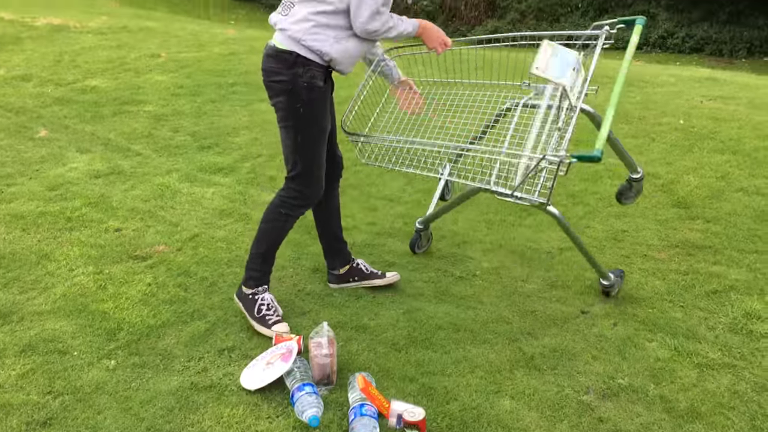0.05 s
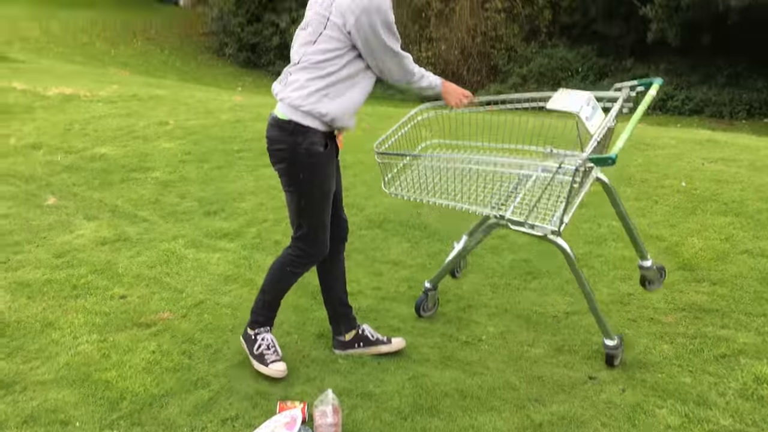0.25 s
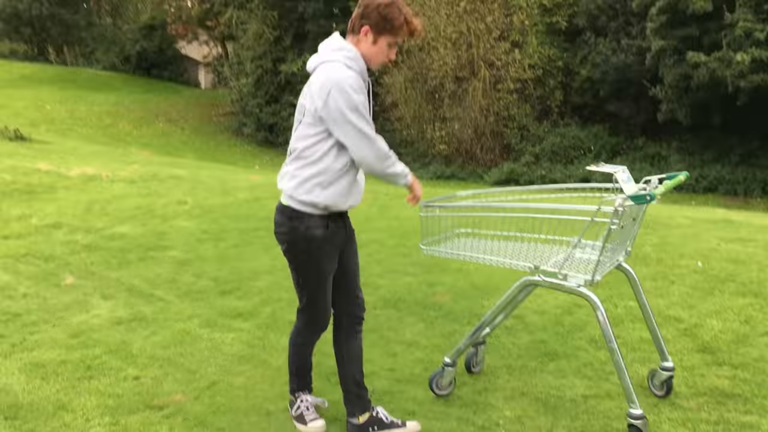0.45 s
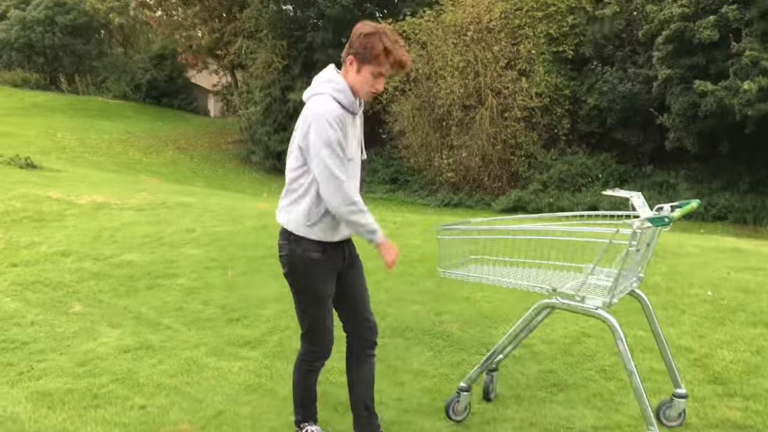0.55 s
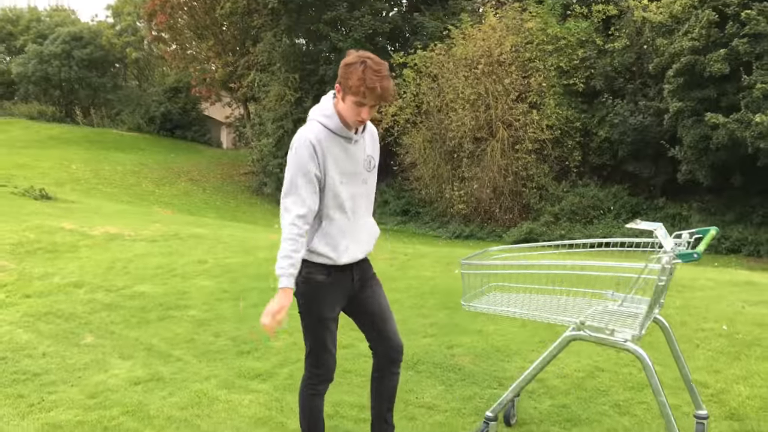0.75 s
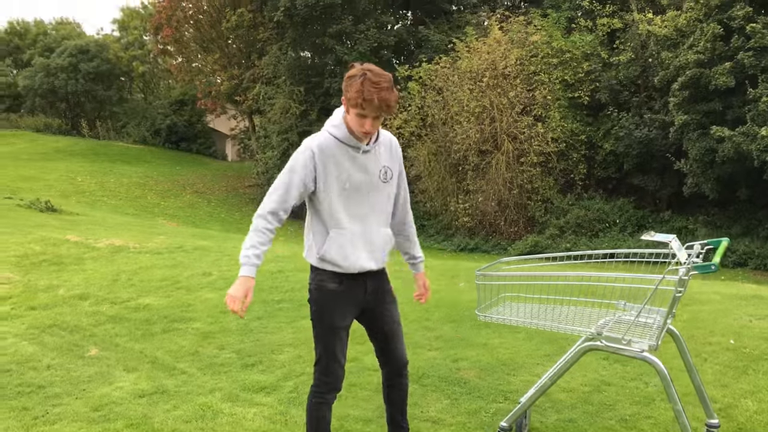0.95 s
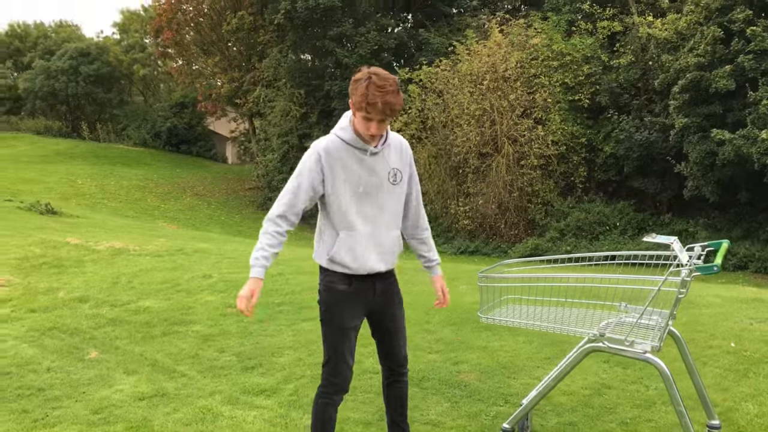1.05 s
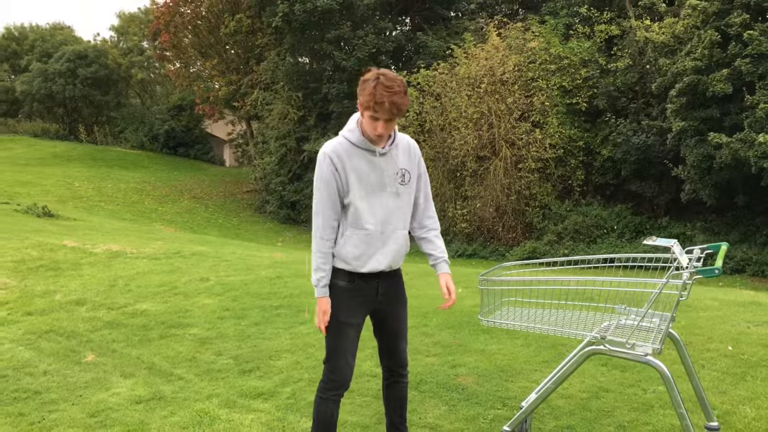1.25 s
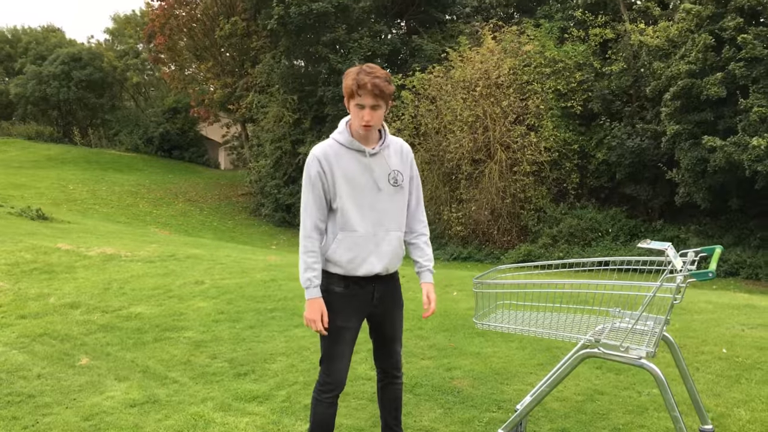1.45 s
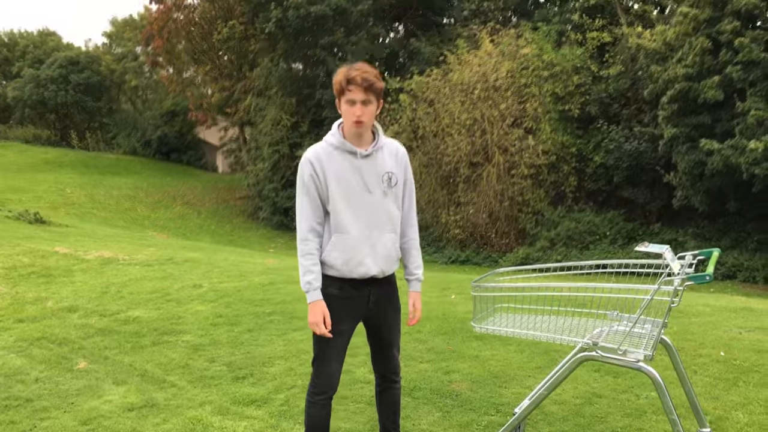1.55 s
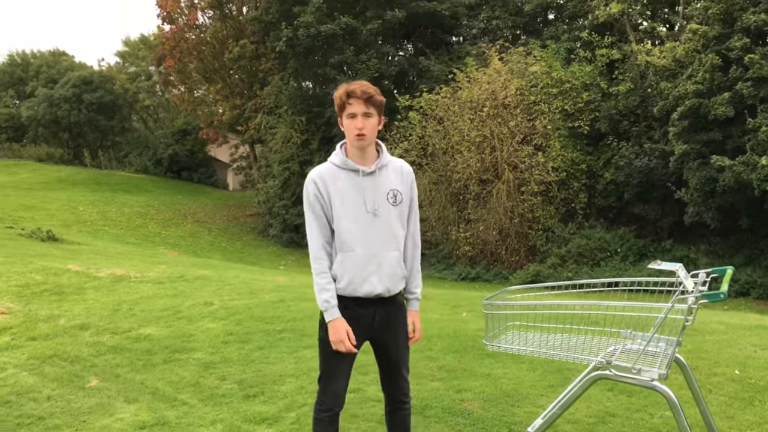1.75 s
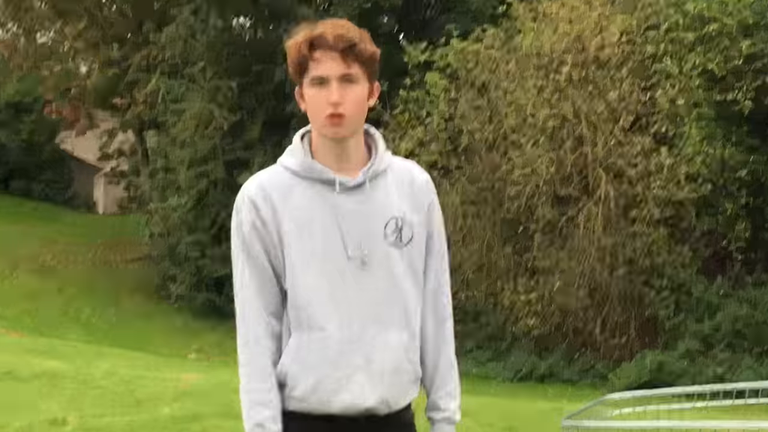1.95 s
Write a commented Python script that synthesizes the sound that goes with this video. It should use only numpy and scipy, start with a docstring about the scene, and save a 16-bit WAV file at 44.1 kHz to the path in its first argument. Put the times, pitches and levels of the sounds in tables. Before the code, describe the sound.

A tipped wire shopping trolley drops onto its wheels on a lawn with one loud metallic crash, loose parts rattle for half a second, then only low outdoor rumble and faint engine-like hum remain, close microphone.

```python
"""On a lawn, a tipped-up wire shopping trolley drops back on its wheels with a crash, then rocks and rattles to
rest. Blows and rattles are chatters of metal contacts ringing many wire modes; blows add frame modes, rattles
loose-part modes. Single wires ping on as decaying sines, and filtered clicks make a faint cloth rustle. Under
it lie a steady outdoor wash of coloured noise and a low, wavering sine hum like a distant engine."""
import sys
import numpy as np
from scipy import signal
from scipy.fft import rfft, irfft
from scipy.io import wavfile

SR = 44100
rng = np.random.default_rng(int(sys.argv[2]) if len(sys.argv) > 2 else 0)


def put_to_file(sound):
    """Save the sound as 16-bit audio at rate SR, in the file named by the first command-line argument."""
    columns = np.atleast_2d(sound).T  # one column per channel
    safe = np.clip(columns, -1, 1)
    whole_steps = np.round(safe * 32767)
    wavfile.write(sys.argv[1], SR, whole_steps.astype(np.int16))


N = 88200  # 2 s

# Relative colour of the outdoor wash. Each row: frequency in Hz, density in dB per Hz.
WASH_COLOUR = [(20, -39), (30, -13.5), (42, -3), (62, -2.5), (90, -7), (120, -14), (175, -14.5),
               (290, -19.5), (450, -23), (640, -17.5), (900, -17.5), (1400, -22), (2000, -29),
               (2800, -36.5), (3600, -38.5), (4800, -49), (6500, -50.5), (8500, -59), (10500, -65),
               (16000, -74)]
# Swell of the bass within the wash. Each row: time in seconds, gain in dB.
RUMBLE_SWELL = [(0, -0.5), (.3, -9), (.6, -3), (1.1, -2.5), (1.6, -0.5), (2, -5)]
# Course of the hum. Each row: time in seconds, level in dB.
HUM_LEVEL = [(0, -64), (.5, -43), (.88, -42.5), (1.04, -39), (1.35, -35.5), (1.7, -34), (1.78, -50),
             (2, -31.5)]
# Course of the faint cloth rustle. Each row: time in seconds, level in dB.
RUSTLE_LEVEL = [(0, -69.5), (.08, -62), (.12, -52.5), (.19, -60), (.35, -41), (.48, -45.5), (.6, -37.5),
                (.7, -49.5), (.86, -69), (.94, -60), (1.03, -66), (1.1, -85), (2, -71.5)]
# Blows of the landing. Each row: start in seconds, level in dB, chatter length in seconds,
# treble tilt in dB per octave, frame ring in dB relative to the blow level.
LANDING_BLOWS = [(0.2157, -13, .003, -2, -12), (0.2208, -12, .011, -1.5, -2.5), (0.239, -43, .006, -3, -27),
                 (0.256, -19.5, .010, -2, -39), (0.297, -29.5, .004, -2.5, -18),
                 (0.346, -32, .020, -1.5, -10)]
# Relative colour of the basket when it lands. Each row: frequency in Hz, gain in dB.
BASKET_COLOUR = [(150, -24), (480, -10.5), (680, -4), (1200, -1), (2200, 2.5), (2700, -5), (3250, 6.5),
                 (4300, 1), (5200, -1), (7000, -3), (8700, 7), (10300, -3.5), (11200, 2), (12000, -1.5),
                 (14800, 5.5), (16500, -8)]
# Tube frame modes. Each row: frequency in Hz, relative level in dB, t60 in seconds.
FRAME_MODES = [(192, -14.5, 0.23), (628.5, -15.5, .12), (797, -12.5, 0.1), (905, 0, 0.11), (1412, -17, .16),
               (1993, -8, 0.148), (2214, -15.5, 0.32), (3120, -8.5, 0.25), (3297, -22.5, 0.31),
               (3540, -22, 0.29), (4000, -9, 0.13)]
# Decay of the wire mesh. Each row: frequency in Hz, t60 in seconds.
MESH_DECAY = [(500, 0.17), (2500, 0.2), (8000, 0.19), (15000, .16)]
# Decay of the lingering shimmer. Each row: frequency in Hz, t60 in seconds.
LINGER_DECAY = [(1000, .7), (4000, 0.92), (9000, .6), (15000, 0.49)]
# Single long-ringing wires. Each row: start in seconds, frequency in Hz, level in dB, t60 in seconds.
WIRE_PINGS = [(.222, 7860, -43.5, 0.49), (.222, 8450, -44, .45), (.222, 8790, -36, .35),
              (.222, 11470, -38, .55), (.222, 11850, -43, .6), (.345, 2346, -37, 0.4),
              (.36, 2180, -41.5, 0.85), (.531, 6230, -45.5, 0.5), (.704, 5997, -34, 0.31),
              (.702, 5815, -40, .28)]
# Later rattles of the loose parts. Each row: start in seconds, level in dB, chatter length in seconds,
# treble tilt in dB per octave.
LOOSE_RATTLES = [(0.5247, -34.5, .004, 1), (0.532, -31, .014, 1), (0.549, -33, .03, -2),
                 (.584, -30.5, .008, 12), (0.5932, -29, 0.013, -2), (0.665, -34, .014, -9),
                 (.695, -28.5, .005, 3), (0.9996, -48, .006, 1), (1.3545, -55.5, .003, -2)]
# Relative colour of the loose parts. Each row: frequency in Hz, gain in dB.
LOOSE_COLOUR = [(300, -21.5), (1000, 4.5), (1800, -4), (2300, 10), (2650, -0.5), (4000, 4), (4900, -2),
                (6100, 1), (7000, -4.5), (9400, -3.5), (10200, -7.5), (11500, -2), (13500, -10.5),
                (16000, -15)]
# Close-set modes of the loose parts. Each row: frequency in Hz, relative level in dB, t60 in seconds.
LOOSE_MODES = [(2190, -23, 0.38), (2275, -19, 0.36), (2360, -19, 0.77), (2540, -13, .2)]

WASH_DB, BASS_EDGE_HZ = -32, 115
HUM_HZ, HUM_WAVER_RMS_FRACTION = 81.2, 0.032
TICKS_PER_S, TICK_T60_S = 3000, 0.017
WIRE_COUNT = 3000  # expected number of modes up to SR / 2
CONTACTS_PER_S = 1000
SNAP_T60_S = 0.031
PING_FLUTTER_RMS_DB = 2.5
BAND_EDGE_HZ = 15850


def amp(db):
    """Decibels to gain."""
    return 10 ** (np.asarray(db) / 20)


def unit(x):
    """Scales to rms 1."""
    return x / np.sqrt(np.mean(x ** 2) + 1e-20)


def read(points, hz):
    """Reads a table on a log-frequency axis."""
    f, value = np.transpose(points)
    return np.interp(np.log(hz + 1), np.log(f + 1), value)


def curve(points):
    """Reads a time table at every sample."""
    return np.interp(np.arange(N) / SR, *np.transpose(points))


def add(mix, start_s, sound):
    """Mixes a sound in at a time, cut at the end of the mix."""
    part = mix[max(round(start_s * SR), 0):][:len(sound)]
    part += sound[:len(part)]


def drift(rate_hz):
    """Slow random motion of rms 1: low-passed noise."""
    hz = np.fft.rfftfreq(N, 1 / SR)
    return unit(irfft(rfft(rng.standard_normal(N)) / (1 + (hz / rate_hz) ** 2) ** 2, N))


def fade(t60_s, t):
    """Exponential decay, 60 dB down at t60."""
    return np.exp(-np.log(1000) * t / np.maximum(t60_s, 1e-3))


def outdoors():
    """Steady distant wash: coloured noise whose bass swells slowly and whose upper part wavers slightly."""
    hz = np.fft.rfftfreq(N, 1 / SR)
    wash = unit(irfft(rfft(rng.standard_normal(N)) * amp(read(WASH_COLOUR, hz)), N))
    bass = irfft(rfft(wash) / (1 + (hz / BASS_EDGE_HZ) ** 8), N)
    upper = (wash - bass) * amp(.5 * drift(rate_hz=5.6))
    return amp(WASH_DB) * (upper + bass * amp(curve(RUMBLE_SWELL)))


def hum():
    """One low sine that wavers in pitch and strength."""
    pitch_hz = HUM_HZ * (1 + HUM_WAVER_RMS_FRACTION * drift(rate_hz=8.6))
    turns = np.cumsum(pitch_hz) / SR
    level_db = curve(HUM_LEVEL) + 0.62 * drift(rate_hz=12)
    return amp(level_db) * unit(np.sin(2 * np.pi * turns))


def rustle():
    """A faint cloth rustle as the trolley moves: tiny clicks of uneven size, each ringing one of 12 short noise
    bursts."""
    t = np.arange(1024) / SR
    size, chance = rng.standard_normal(N), rng.random(N)
    which = rng.integers(0, 12, N)
    clicks = size * (chance < TICKS_PER_S / SR)
    ticks = np.zeros(N)
    for k in np.unique(which):
        burst = rng.standard_normal(len(t)) * fade(TICK_T60_S, t)
        ticks += signal.fftconvolve(clicks * (which == k), burst)[:N]
    gain = amp(read(LOOSE_COLOUR, np.fft.rfftfreq(N, 1 / SR)))
    return amp(curve(RUSTLE_LEVEL)) * unit(irfft(rfft(ticks) * gain, N))


def chatter(length_s):
    """A first contact and a burst of random further ones, of total energy 1."""
    size, chance = rng.standard_normal(4096), rng.random(4096)
    within = np.arange(len(size)) < length_s * SR
    clicks = size * (chance < CONTACTS_PER_S / SR) * within
    clicks[0] = 1
    return clicks / np.linalg.norm(clicks)


def ringing(wires, decay):
    """Many wire modes of random strength, each band dying at its own speed."""
    t, hz = np.arange(SR) / SR, np.arange(SR // 2 + 1)
    a, b = rng.standard_normal((2, len(hz)))
    modes = wires * (a + 1j * b)
    ring = np.zeros(SR)
    for centre_hz, t60_s in decay:
        # neighbouring bands crossfade
        band = read([(f, float(f == centre_hz)) for f, _ in decay], hz)
        ring += irfft(modes * band) * fade(t60_s, t)
    return ring / irfft(modes).std()


def mesh(wires, length_s, colour, tilt_db_per_octave, linger_db, snap_db):
    """Chatter on the wires: a dry snap, a dense ring, and a weak lingering shimmer."""
    t, hz = np.arange(SR) / SR, np.arange(SR // 2 + 1)
    ring = ringing(wires, MESH_DECAY)
    snap = amp(snap_db) * rng.standard_normal(SR) * fade(SNAP_T60_S, t)
    struck = signal.fftconvolve(ring + snap, chatter(length_s))[:SR]
    struck += amp(linger_db) * ringing(wires, LINGER_DECAY) * np.minimum(t / length_s, 1)
    octaves = np.log2(np.maximum(hz, 1500) / 4000)  # tilt is flat below 1500 Hz
    gain = unit(amp(read(colour, hz) + tilt_db_per_octave * octaves))
    end_fade = np.clip((.9 - t) * 10, 0, 1)
    return irfft(rfft(struck) * gain) * end_fade / np.sqrt(2)


def modal(modes):
    """A part rings with a few strong modes: decaying sines of random phase with a 2.9 ms onset."""
    t = np.arange(SR) / SR
    ring = np.zeros(SR)
    for hz, db, t60_s in modes:
        ring += amp(db) * fade(t60_s, t) * np.sin(2 * np.pi * (hz * t + rng.random()))
    return ring * np.minimum(t / 0.0029, 1)


def landing(wires):
    """Each blow of the landing rings the basket's wire mesh and the tube frame."""
    out = np.zeros(N)
    for start_s, db, length_s, tilt, frame_db in LANDING_BLOWS:
        basket = mesh(wires, length_s, BASKET_COLOUR, tilt, linger_db=-16.5, snap_db=6.5)
        frame = amp(frame_db) * modal(FRAME_MODES)
        add(out, start_s, amp(db) * (basket + frame))
    return out


def pings():
    """Single wires ring on as decaying sines of fluttering level, with an 8 ms onset."""
    out, t = np.zeros(N), np.arange(SR) / SR
    for start_s, hz, db, t60_s in WIRE_PINGS:
        level = amp(db + PING_FLUTTER_RMS_DB * drift(rate_hz=71)[:SR])
        envelope = np.minimum(t / .008, 1) * fade(t60_s, t)
        add(out, start_s, level * envelope * np.sin(2 * np.pi * hz * t))
    return out


def rattles(wires):
    """Loose parts chatter on the wires and ring at a cluster of close modes."""
    out = np.zeros(N)
    for start_s, db, length_s, tilt in LOOSE_RATTLES:
        parts = mesh(wires, length_s, LOOSE_COLOUR, tilt, linger_db=-9, snap_db=9)
        add(out, start_s, amp(db) * (parts + modal(LOOSE_MODES)))
    return out


def scene():
    """Everything reaches one microphone, alike in both channels."""
    # blows and rattles share one set of wire frequencies
    wires = rng.random(SR // 2 + 1) < WIRE_COUNT / (SR / 2)
    trolley = landing(wires) + rattles(wires) + pings() + rustle()
    return np.tile(trolley + outdoors() + hum(), (2, 1))


def record(dry):
    """The loudest peaks are rounded off; then the recorder's band limit, a linear-phase low-pass."""
    soft = dry / (1 + (dry / .85) ** 6) ** (1 / 6)
    lowpass = signal.firwin(511, BAND_EDGE_HZ, window=("kaiser", 9), fs=SR)
    return signal.oaconvolve(soft, lowpass[None], "same")


dry = scene()
out = record(dry)
put_to_file(out)
```